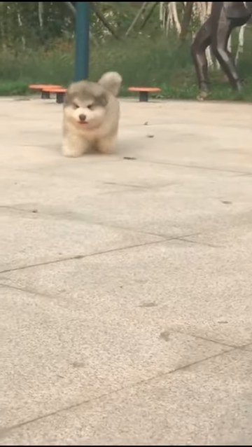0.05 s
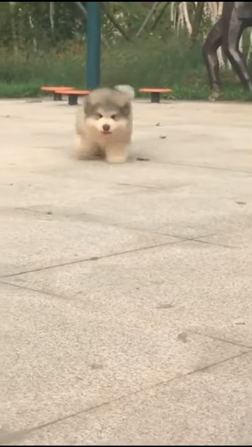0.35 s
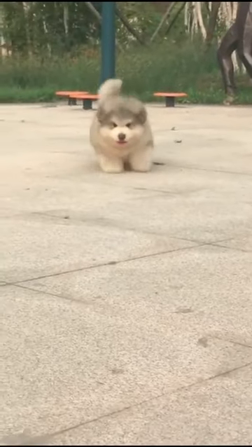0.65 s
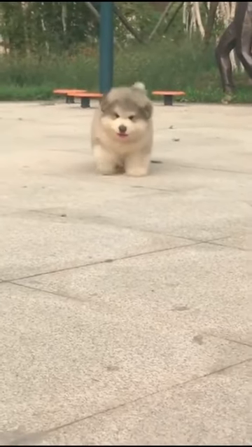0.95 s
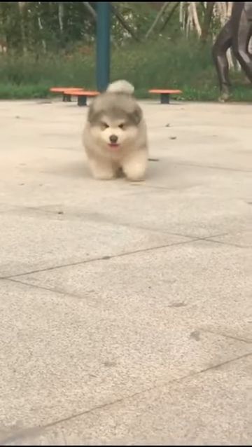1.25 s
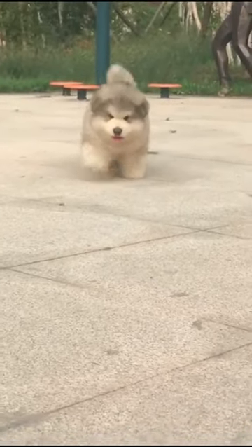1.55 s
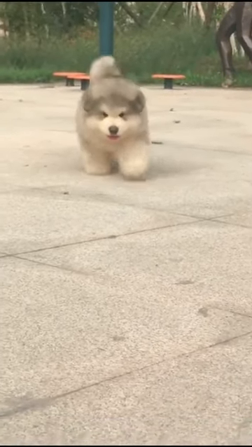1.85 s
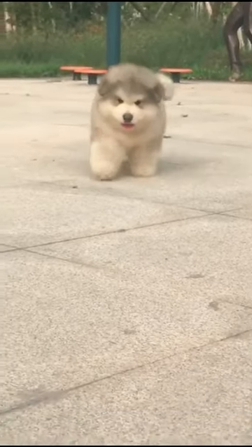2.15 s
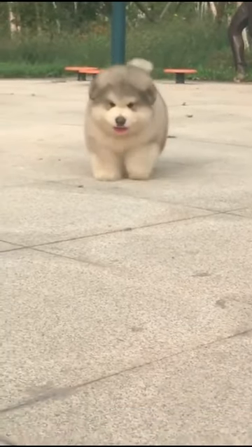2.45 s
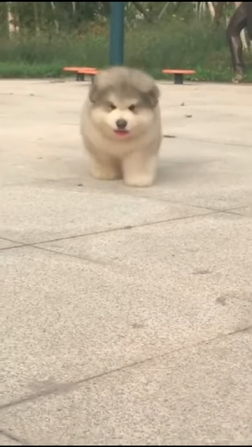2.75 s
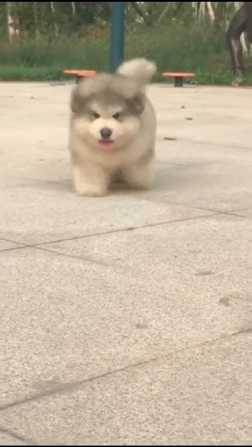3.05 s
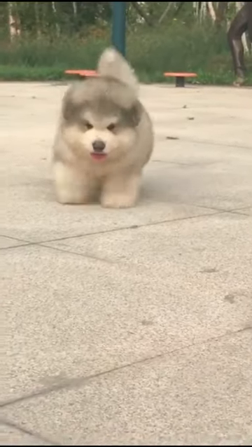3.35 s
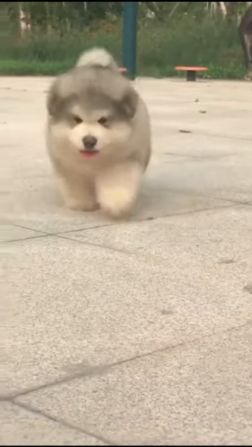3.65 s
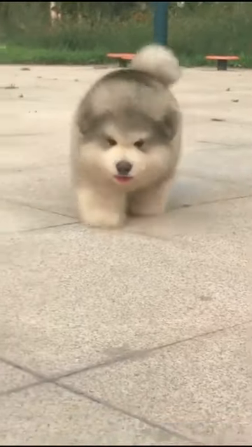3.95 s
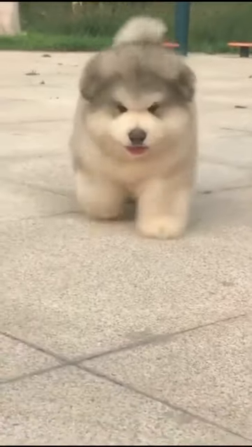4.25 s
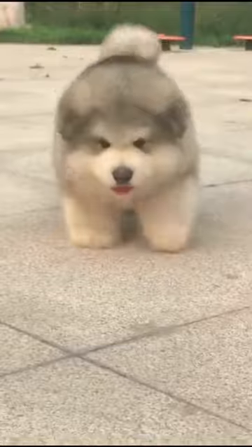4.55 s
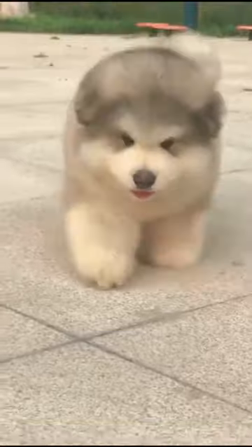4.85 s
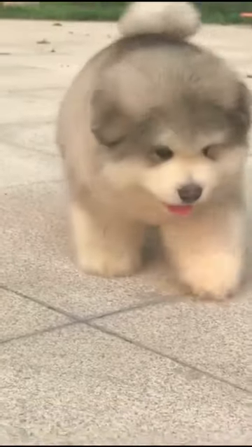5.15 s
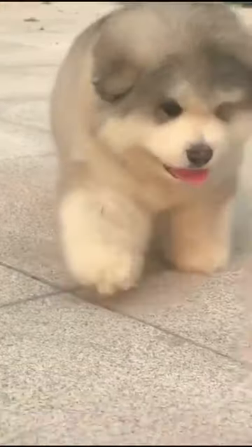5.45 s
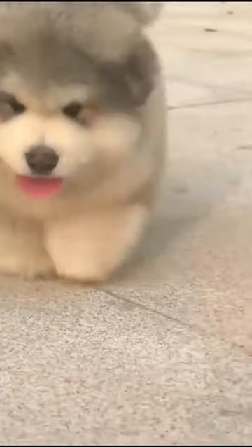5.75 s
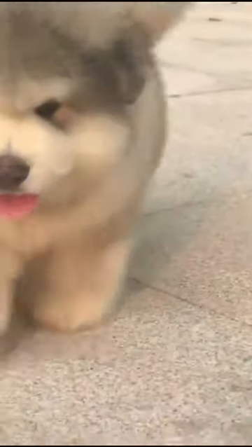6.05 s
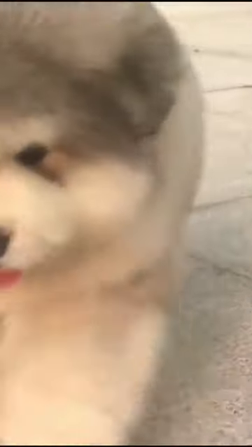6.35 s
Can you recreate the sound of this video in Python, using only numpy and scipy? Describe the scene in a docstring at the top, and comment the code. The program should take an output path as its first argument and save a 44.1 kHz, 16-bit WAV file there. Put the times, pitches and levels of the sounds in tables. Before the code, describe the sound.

Someone close to the microphone calls a puppy with quick, wet tongue clicks, five to seven a second. The clicking slows slightly, breaks off for a moment near the end, then resumes. Behind it, the open paved yard carries a low rumble of distant traffic that swells a little, a soft outdoor hiss and a few barely audible rustles.

```python
"""Quick tongue clicks, five to seven a second: someone is calling a puppy across a paved yard.
Each click is a short hiss of air sucked past the tongue tip, coloured by the cavity behind the teeth,
and ends in a soft pop as the tongue lets go and excites the resonances of the mouth.
The paws are too soft to hear; behind the clicks are faint rustles, the rumble of distant traffic
and an outdoor hiss with a thin high whine."""
import sys
import numpy as np
from scipy import signal
from scipy.fft import rfft, irfft, next_fast_len
from scipy.io import wavfile
from scipy.ndimage import map_coordinates

SR = 44100
rng = np.random.default_rng(int(sys.argv[2]) if len(sys.argv) > 2 else 0)


def output_pcm(signal):
    """Save a mono or channel-first signal as 16-bit PCM at the path in sys.argv[1].

    Samples are clipped to [-1, 1] before scaling.
    """
    pcm = np.clip(np.atleast_2d(signal).T, -1, 1) * 32767
    wavfile.write(sys.argv[1], SR, np.round(pcm).astype(np.int16))


N = 286209

# tongue clicks: (start [s], time to release [s], suction level [dB], hiss level at release [dB],
# pop level [dB], pop centre [Hz])
CLICKS = [(0.132, 0.005, -35, -27, -44, 1660), (0.281, 0.011, -46.5, -40.5, -47, 1260.0),
          (0.418, 0.0078, -40, -34.5, -48, 1310), (0.556, 0.015, -37.5, -35.5, -49, 1230.0),
          (0.707, 0.013, -39, -35.5, -40, 1560.0), (0.863, 0.01, -40, -35.5, -47, 1570),
          (1.024, 0.012, -42, -38, -43.5, 1610.0), (1.174, 0.015, -45, -40.5, -45, 970.0),
          (1.311, 0.019, -50, -41.5, -46.5, 1360.0), (1.478, 0.018, -42, -39.5, -42.5, 950),
          (1.637, 0.015, -39.5, -37.5, -41.5, 1430.0), (1.806, 0.018, -44.5, -39, -42, 1720),
          (1.98, 0.017, -44, -39.5, -49.5, 1130.0), (2.167, 0.015, -42, -34.5, -45.5, 1090),
          (2.349, 0.013, -42, -45.5, -47, 770.0), (2.523, 0.0097, -40, -37.5, -41, 1430.0),
          (2.694, 0.014, -41.5, -39.5, -42, 1040), (2.875, 0.011, -37.5, -37.5, -46.5, 1370.0),
          (3.047, 0.021, -46.5, -51.5, -62, 1510.0), (3.216, 0.015, -37.5, -41.5, -48.5, 1700.0),
          (3.396, 0.0037, -46, -42.5, -52.5, 1440.0), (3.567, 0.0088, -28.5, -39.5, -53, 1700.0),
          (3.736, 0.02, -42.5, -44.5, -47.5, 1030.0), (3.931, 0.016, -41.5, -43, -45, 1710),
          (4.119, 0.011, -36.5, -51, -48.5, 1410.0), (4.305, 0.012, -41.5, -46.5, -48.5, 1070.0),
          (4.508, 0.015, -43, -51.5, -72, 1250.0), (4.67, 0.014, -40.5, -41, -48, 1190.0),
          (4.858, 0.018, -47.5, -50.5, -53, 1060), (5.034, 0.011, -39, -43, -50, 1510.0),
          (5.454, 0.018, -40.5, -44.5, -42, 920), (5.622, 0.021, -41, -47.5, -45.5, 1000.0),
          (5.807, 0.017, -42, -43, -46, 1670.0), (5.994, 0.018, -48, -45.5, -49, 1460.0),
          (6.164, 0.019, -41, -42, -42.5, 815), (6.345, 0.02, -47, -44.5, -43, 1700.0)]
# the cavity behind the teeth slowly widens as the clicking goes on: (time [s], pitch [Hz])
CAVITY_PITCH = [(0.0, 4270), (0.9, 4380), (2.4, 4120), (3.8, 4220), (5.2, 4170), (6.4, 3890)]
# a tighter gap at the tongue tip squeaks more: (time [s], tilt about the cavity pitch [dB])
SQUEAK = [(0.1, -1.5), (0.3, 4.5), (1.0, 2.0), (1.9, -1.5), (3.4, -0.5), (4.6, -3.5), (5.7, 3.5)]
# top of the hiss: (time [s], brightness [dB]), applied half at 7.2 kHz and twice at 9.5 kHz
BRIGHTNESS = [(0.0, -1.5), (1.3, -1.3), (2.3, 1.6), (3.1, -1.3), (3.9, 1.3), (5.4, 3.2), (6.4, 1.0)]
def tongue_clicks(pitch_scatter=0.0069, colour_scatter_db=1.3, quick_s=0.008, dull_db=24.0):
    """Suction and release: a hiss, then a pop, from a mouth never shaped quite the same twice."""
    out = np.zeros(N + SR)
    t = np.arange(-256, 3840) / SR
    for start, release, suction_db, release_db, pop_db, centre_hz in CLICKS:
        pitch, tightness, edge = rng.standard_normal(3)
        cavity_hz = at(CAVITY_PITCH, start) * (1 + pitch_scatter * pitch)
        squeak_db = at(SQUEAK, start) + colour_scatter_db * tightness
        dulling = dull_db * max(1 - release / quick_s, 0)  # the quickest clicks are duller
        brightness = at(BRIGHTNESS, start) - dulling + colour_scatter_db * edge
        click = suction_hiss(t, release, suction_db, release_db, cavity_hz, squeak_db, brightness)
        click += amp(pop_db) * release_pop(t - release, centre_hz)
        out[round((start + t[0]) * SR):][:len(t)] += click
    return out[:N]


# resonances behind the teeth: (frequency / cavity pitch [ratio], bandwidth [Hz], gain [dB])
TEETH_MODES = [(.8, 159, -12.5), (0.869, 162, -6.5), (1.003, 132, 3.5), (1.262, 138, -4.5),
               (1.55, 252, -11.5), (1.75, 252, -13.5), (2.2, 300, -22.5)]
# broadband part of the hiss: (frequency [Hz], gain [dB])
HISS_SPECTRUM = [(200, -22.5), (900, -18.5), (2250, -11.5), (2800, -18), (3400, -5), (4500, -14.5),
                 (6300, -12.5), (9000, -14), (11000, -29)]
def suction_hiss(t, release, suction_db, release_db, cavity_hz, squeak_db, brightness,
                 sputter_db=5.0, grain_s=0.0006, mode_scatter_db=1.8, sag=0.035, snap=6.0):
    """Source and filter: a jet sputters through the wet gap and rings the cavity behind the teeth."""
    flow = airflow(t, release, suction_db, release_db)
    grains = map_coordinates(rng.standard_normal(len(t)), [(t - t[0]) / grain_s], order=1)
    jet = flow * amp(sputter_db * grains) * rng.standard_normal(len(t))
    jet[np.argmin(abs(t - release))] += snap * amp(release_db)  # the film of saliva snaps
    modes = [(ratio * cavity_hz, width, db + mode_scatter_db * rng.standard_normal())
             for ratio, width, db in TEETH_MODES]
    tilt = [(2600, 0), (3400, -squeak_db), (cavity_hz, 0), (5300, squeak_db),
            (7200, brightness / 2 - 2.0), (9500, 2 * brightness + 0.5)]

    def cavity(f):
        gain = np.hypot(abs(resonances(modes, f)), gain_at(HISS_SPECTRUM, f))
        return minimum_phase(gain * gain_at(tilt, f))

    hiss = filtered(jet, cavity)
    # the cavity grows as the tongue draws back, so its pitch sags
    speed = 1 - sag * np.clip(t / release - 0.5, -0.5, 0.5) * (t > 0)
    hiss = map_coordinates(hiss, [np.cumsum(speed)])
    return unit_rms(hiss) * np.sqrt(np.mean(flow ** 2))


def airflow(t, release, suction_db, release_db, dip_db_per_s=170.0, dip_share=0.65,
            rise=0.0032, settle=0.002, swell=0.0016, hold=0.0032, fall_t60=0.015):
    """Flow envelope: suction starts sharply, slackens, swells as the tongue peels off, then dies."""
    dip_db = (suction_db + release_db) / 2 - dip_db_per_s * release
    end = release + hold + fall_t60
    times = [-rise, 0, settle, dip_share * release, release - swell, release + hold, end]
    levels = [suction_db - 29, suction_db - 2, suction_db, dip_db,
              release_db, release_db - 0.5, release_db - 60]
    flow = amp(np.interp(t, np.maximum.accumulate(times), levels))
    return flow * (t > -rise) * (t < end)


# resonances of the opening mouth: (frequency [Hz], bandwidth [Hz], gain [dB])
MOUTH_MODES = [(522, 180, 3.5), (710, 220, -5), (1040, 210, 1), (1580, 570, -5.5), (2265, 280, -1.5),
               (3330, 170, 2)]
def release_pop(t, centre_hz, smack_t60=0.023, octaves=1.3, wetness=0.23, scatter=0.063):
    """Impulse excitation: the tongue lets go at t = 0; a pressure step and wet smack ring the mouth."""
    smack = wetness * rng.standard_normal(len(t)) * amp(-60 * abs(t) / smack_t60) * (t > 0)
    smack[np.argmin(abs(t))] += 1
    modes = []
    for hz, width, db in MOUTH_MODES:
        rolloff_db = 6 * (np.log2(hz / centre_hz) / octaves) ** 2
        modes.append((hz * np.exp(scatter * rng.standard_normal()), width, db - rolloff_db))
    ring = filtered(smack, lambda f: resonances(modes, f))
    return ring / np.linalg.norm(ring) * np.sqrt(0.0086 * SR)  # the energy of 8.6 ms at rms 1


def yard_echo(x, near_db=-16.0, near_t60=0.022, far_db=-22.5, far_t60=0.2):
    """Diffuse reflection: the paving scatters each click back at once; trees and walls answer faintly."""
    t = np.arange(SR // 2) / SR
    echo = np.zeros(len(t))
    for db, t60 in (near_db, near_t60), (far_db, far_t60):
        tail = rng.standard_normal(len(t)) * amp(-60 * t / t60) * (t > 0.004)
        echo += amp(db) * tail / np.linalg.norm(tail)
    return x + signal.fftconvolve(x, echo)[:N]


# rustles around the yard: (peak time [s], rise time [s], frequency [Hz], bandwidth [Hz], level [dB])
RUSTLES = [(2.911, 0.042, 4800, 3500, -61.5), (3.132, .12, 4230, 1500, -64.5),
           (4.2, .13, 5040, 2600, -63.5), (6.462, 0.067, 2450, 600, -60)]
def rustles():
    """Amplitude-modulated noise: brief, soft, high swells, barely above the background."""
    out = np.zeros(N + SR)
    for peak, rise, hz, width_hz, db in RUSTLES:
        n = round(2 * rise * SR)
        out[round((peak - rise) * SR):][:n] += amp(db) * np.hanning(n) * band_noise(hz, width_hz, n)
    return out[:N]


# traffic rumble: (frequency [Hz], relative spectral density [dB])
RUMBLE_SPECTRUM = [(15, -47), (25, -23), (32, -20), (40, -10), (50, -2.5), (70, -1), (98, -1), (140, -13),
                   (205, -16.5), (280, -25.5), (400, -48), (660, -100)]
# swell of the rumble: (time [s], level [dB])
RUMBLE_LEVEL = [(0.0, -47.8), (2.9, -48.5), (3.6, -46.7), (4.35, -49), (5.15, -43.3), (6.0, -44.7),
                (6.49, -44.3)]
# far tyre noise: (frequency [Hz], relative spectral density [dB])
TYRE_SPECTRUM = [(150, -12.5), (300, 7), (450, -1.5), (630, 1), (800, -2.5), (1020, 0.5), (1500, -4),
                 (2200, -9.5), (4000, -36)]
def traffic(drone_db=-51.5, drone_hz=80.75, hum_db=-68.0, hum_hz=167.3, width_hz=8.5,
            tyre_start_db=-63.5, approach_db_per_s=1.0534, waver_db=0.94):
    """Incoherent sources add: road rumble, narrowband engine drones and tyre noise drawing nearer."""
    t = np.arange(N) / SR
    rumble = amp(at(RUMBLE_LEVEL, t)) * coloured_noise(RUMBLE_SPECTRUM)
    tyre_db = tyre_start_db + approach_db_per_s * t + waver_db * wobble(8)
    tyres = amp(tyre_db) * coloured_noise(TYRE_SPECTRUM)
    drone = amp(drone_db) * band_noise(drone_hz, width_hz)
    hum = amp(hum_db) * band_noise(hum_hz, width_hz)
    return rumble + tyres + drone + hum


# outdoor hiss: (frequency [Hz], relative spectral density [dB])
AIR_SPECTRUM = [(1200, -16), (2600, -0.5), (3900, 1.5), (5200, -2), (6500, -2), (7400, -4.5), (8800, -0.5),
                (9400, -14), (11000, -43)]
def open_air(hiss_db=-65.0, waver_db=0.75, whine_db=-74.0, whine_hz=8420.0, whine_width_hz=130.0):
    """Ambient noise floor: a faint broadband hiss with a fuzzy narrowband whine on top."""
    hiss = amp(hiss_db + waver_db * wobble(4.52)) * coloured_noise(AIR_SPECTRUM)
    return hiss + amp(whine_db) * band_noise(whine_hz, whine_width_hz)


def amp(db):
    return 10 ** (np.asarray(db) / 20)


def unit_rms(x):
    return x / np.sqrt(np.mean(x ** 2) + 1e-20)


def at(points, t):
    """Linear interpolation of (time [s], value) points."""
    return np.interp(t, *np.transpose(points))


def gain_at(spectrum, f):
    """Amplitude gain from (frequency [Hz], gain [dB]) points, interpolated in log frequency."""
    hz, db = np.transpose(spectrum)
    return amp(np.interp(np.log(f + 1), np.log(hz + 1), db))


def wobble(rate):
    """Slow modulation: a spline through random knots, rate of them a second."""
    knots = rng.standard_normal(int(N * rate / SR) + 4)
    return map_coordinates(knots, [np.arange(N) * rate / SR])


def filtered(x, response):
    """Linear filtering: the spectrum of x times a frequency response."""
    size = next_fast_len(2 * len(x))
    return irfft(rfft(x, size) * response(np.fft.rfftfreq(size, 1 / SR)), size)[:len(x)]


def resonances(modes, f):
    """Modal superposition of (frequency [Hz], bandwidth [Hz], gain [dB]) modes, alternating in sign."""
    return sum((-1) ** k * amp(db) * 1j * f * width / (hz * hz - f * f + 1j * f * width)
               for k, (hz, width, db) in enumerate(modes))


def minimum_phase(gain):
    """Causality: the response with this gain that rings only after its cause."""
    cepstrum = irfft(np.log(np.maximum(gain, 1e-6)))
    half = len(cepstrum) // 2
    fold = np.r_[1, np.full(half - 1, 2), 1, np.zeros(half - 1)]
    return np.exp(rfft(cepstrum * fold))


def coloured_noise(spectrum):
    """Spectral shaping: white noise given this spectrum, at rms 1."""
    return unit_rms(filtered(rng.standard_normal(N), lambda f: gain_at(spectrum, f)))


def band_noise(hz, width_hz, size=N):
    """Resonant filtering: white noise passed twice through one resonator, at rms 1."""
    white = rng.standard_normal(size)
    return unit_rms(filtered(white, lambda f: resonances([(hz, width_hz, 0)], f) ** 2))


def scene():
    """Superposition: close clicks and their reflections over the background, in mono."""
    return (yard_echo(tongue_clicks()) + rustles() + traffic() + open_air())[None]


def record(dry, top_hz=10950):
    """Band limiting: a steep low-pass removes the highest treble."""
    edge = [(top_hz - 200, 0), (top_hz, -5), (top_hz + 150, -25), (top_hz + 500, -100)]
    return np.array([filtered(channel, lambda f: gain_at(edge, f)) for channel in dry])


dry = scene()
out = record(dry)
output_pcm(out)
```